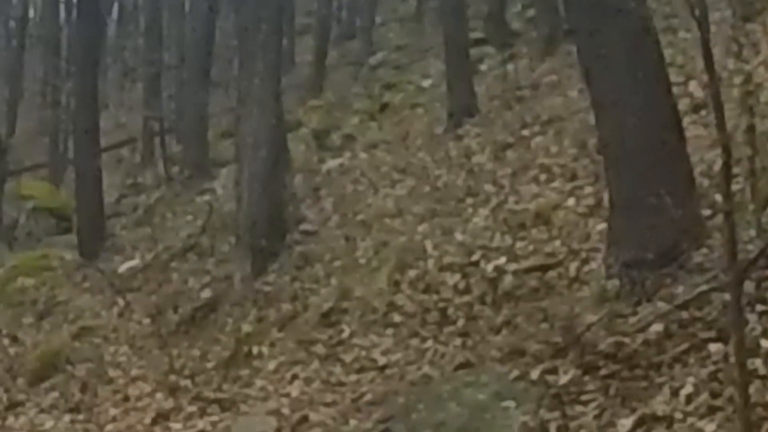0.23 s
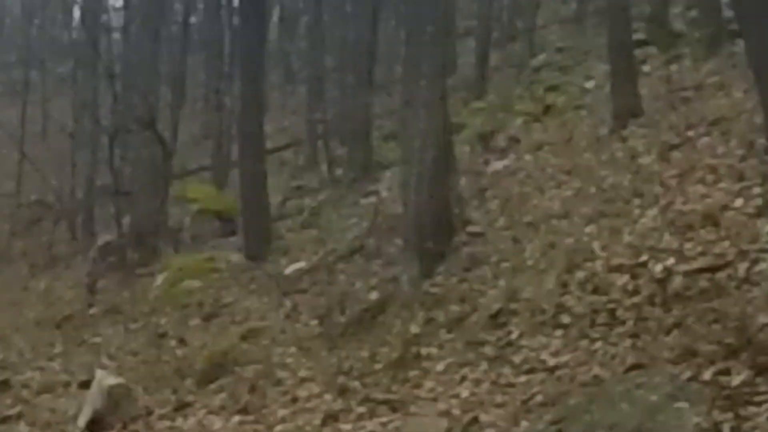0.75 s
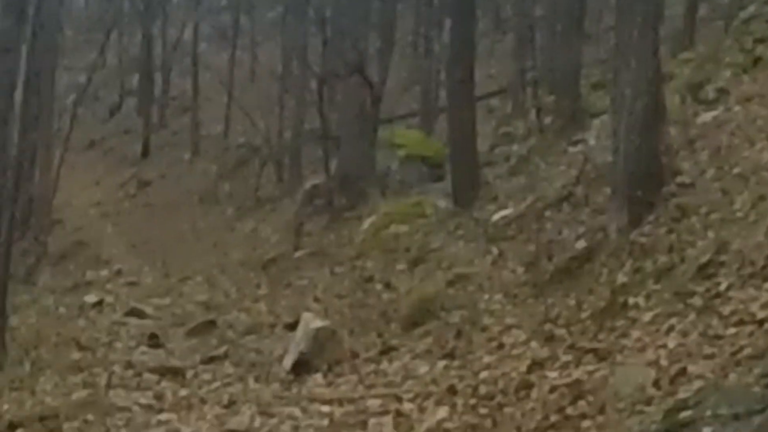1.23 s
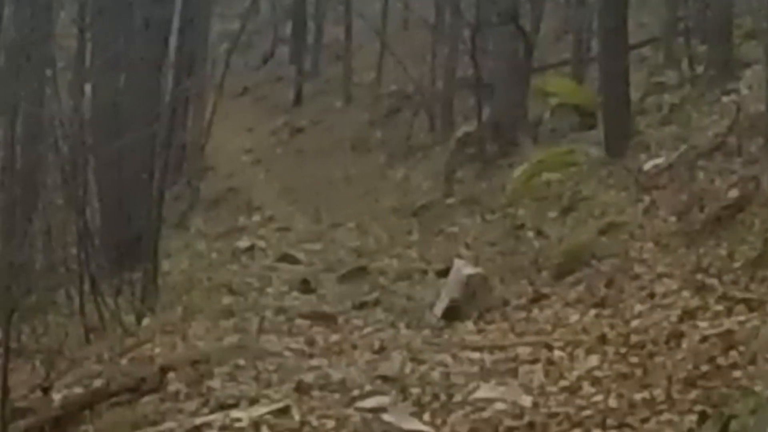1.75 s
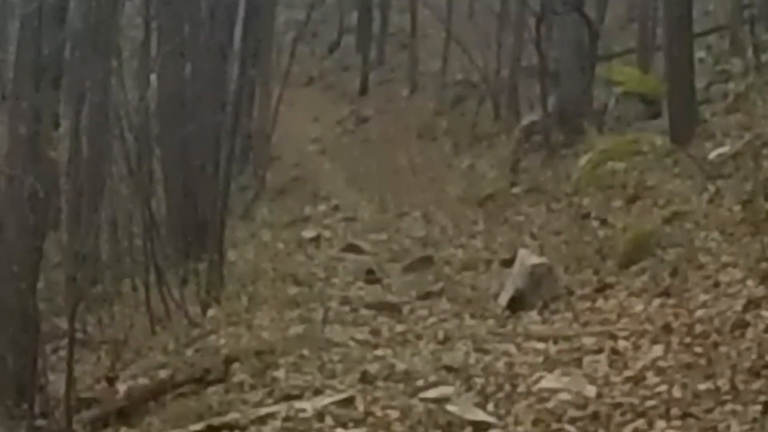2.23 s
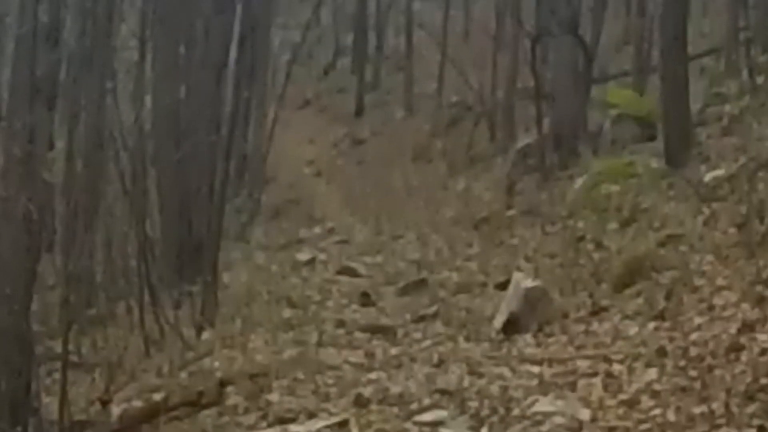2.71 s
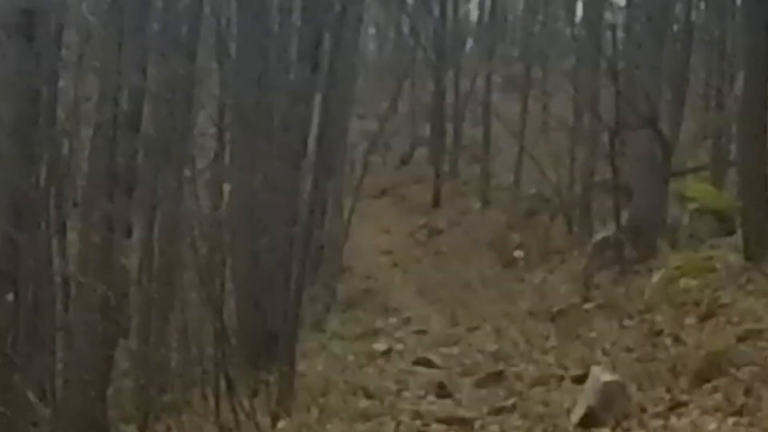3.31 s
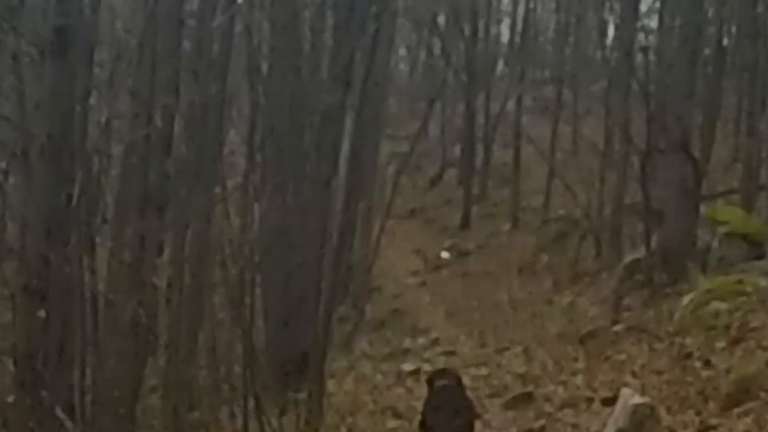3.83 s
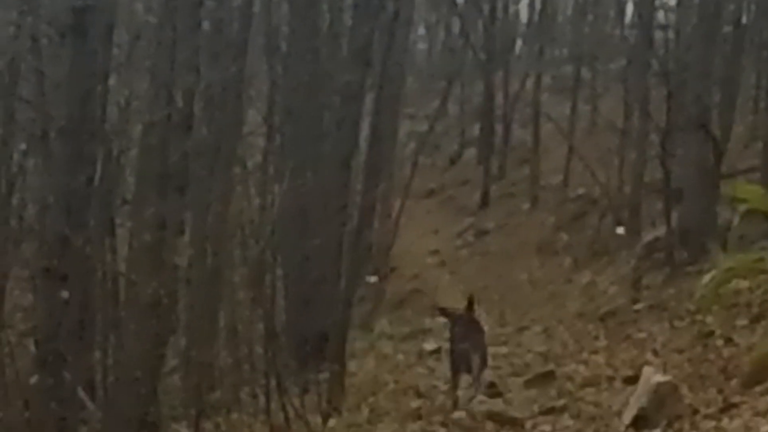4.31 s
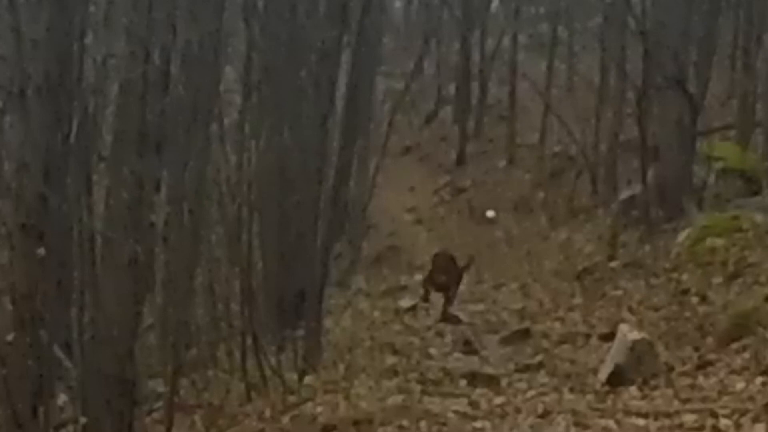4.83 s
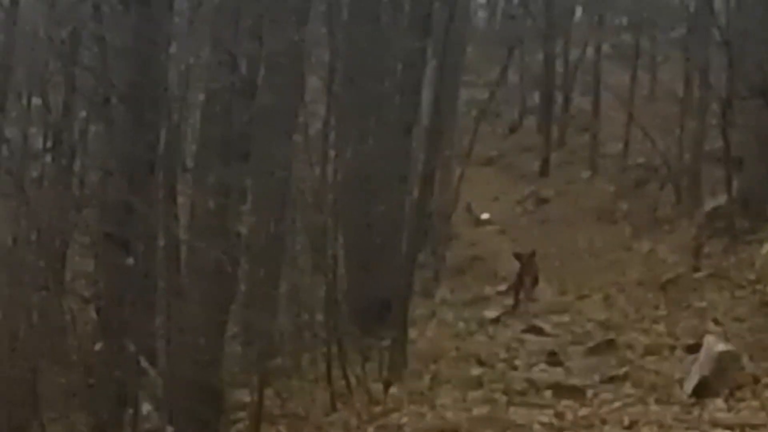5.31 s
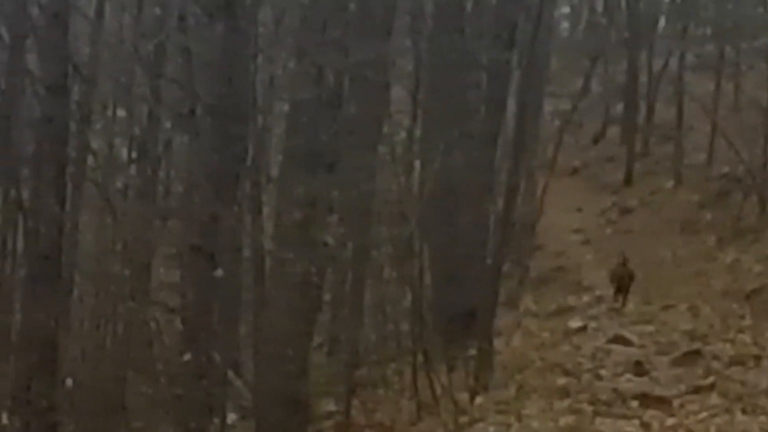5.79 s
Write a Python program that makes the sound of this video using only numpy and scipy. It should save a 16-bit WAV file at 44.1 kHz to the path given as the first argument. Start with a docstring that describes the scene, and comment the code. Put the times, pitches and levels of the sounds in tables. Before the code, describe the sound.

Close, light crunches of dry leaves and snapping twigs sound over the faint hush of woods, with slight air rumble on a handheld microphone. Its casing takes a small hollow knock and later a much louder, sharp one with a low thump. About eight hard, uneven clicks come next, close by. A couple of soft crunches follow, and a faint, short, rising animal whine sounds far off.

```python
"""Quiet forest: someone shifts about on dry leaves, holding the microphone.
Leaves crunch in bursts of tiny fractures and snapping twigs ring in damped modes. Hand swings push air
over the microphone; its plastic casing takes a hollow knock, later a loud, sharp one with a jolt.
A run of hard clicks follows close by. At the end a distant animal gives a short rising whine."""
import sys
import numpy as np
from scipy import signal
from scipy.fft import rfft, irfft, next_fast_len
from scipy.io import wavfile
from scipy.ndimage import uniform_filter1d

SR = 44100
rng = np.random.default_rng(int(sys.argv[2]) if len(sys.argv) > 2 else 0)


def dump(signal):
    """Clip the signal to [-1, 1] and save it as 16-bit WAV at the path in sys.argv[1]."""
    limited = np.clip(np.atleast_2d(signal).T, -1, 1)
    pcm = np.round(limited * 32767).astype(np.int16)
    wavfile.write(sys.argv[1], SR, pcm)


N = 267025
T = np.arange(N) / SR
BLOW_S = T[:SR // 5]  # time since a blow

# leaf fracture spectrum: f/Hz, level/dB
LEAF_SPECTRUM = [(200, -4), (600, -7.5), (950, 0), (1230, 4), (1550, -2.5), (2350, 2), (3000, -1),
                 (3700, -7), (4900, -3.5), (6000, -11), (6900, -7.5), (7700, -13.5), (8600, -12.5),
                 (10000, -18.5), (15000, -26.5)]


def undb(db):
    """Decibels to gain."""
    return 10 ** (np.asarray(db) / 20)


def unit(x):
    """Scale to unit rms."""
    return x / np.sqrt(np.mean(x ** 2))


def burst(x, db):
    """Scale the loudest 2 ms to an rms level."""
    return x * undb(db) / np.sqrt(uniform_filter1d(x ** 2, size=88).max())


def add(track, at_s, x):
    """Mix x into the track."""
    i = int(at_s * SR)
    track[i:i + len(x)] += x[:N - i]


def cut(x, hz, kind, order=2):
    """Butterworth low- or high-pass."""
    return signal.sosfilt(signal.butter(order, hz, kind, fs=SR, output="sos"), x)


def resonate(x, hz, width_hz):
    """Band-pass, unit gain at the centre."""
    return signal.lfilter(*signal.iirpeak(hz, hz / width_hz, fs=SR), x)


def colour(x, points):
    """Minimum-phase filter through points of f/Hz, level/dB."""
    size = 2 * next_fast_len(len(x))
    hz, db = np.transpose(points)
    bin_hz = np.arange(size // 2 + 1) * SR / size
    gain = undb(np.interp(np.log(bin_hz + 1), np.log(hz), db))
    cepstrum = irfft(np.log(gain))
    cepstrum[1:size // 2] *= 2
    cepstrum[size // 2 + 1:] = 0
    return irfft(rfft(x, size) * np.exp(rfft(cepstrum)))[:len(x)]


def hold(start_s, end_s, ramp_s):
    """Trapezoid envelope, 0 to 1."""
    return np.clip(np.minimum(T - start_s, end_s - T) / ramp_s, 0, 1)


def walk(rate_hz, count=N):
    """Smooth random drift, unit rms."""
    k = int(SR / rate_hz)
    steps = np.repeat(rng.standard_normal(count // k + 1), k)
    return unit(uniform_filter1d(uniform_filter1d(steps, k), k)[:count])


def fade(t60_s):
    """Exponential decay after a blow."""
    return np.exp(-np.log(1000) * BLOW_S / t60_s)


def dying_noise(t60_s):
    """White noise decaying after a blow."""
    return rng.standard_normal(len(BLOW_S)) * fade(t60_s)


def ring(modes, detune, tilt_db_oct=0):
    """Damped modes; pitch and strength vary from blow to blow."""
    out = 0
    for k, (hz, db, t60_s) in enumerate(modes):
        pitch_draw, jitter_db = rng.standard_normal(2)
        gain = undb(db + jitter_db + tilt_db_oct * np.log2(hz / modes[0][0]))
        tone = np.sin(2 * np.pi * hz * (1 + detune * pitch_draw) * BLOW_S)
        out = out + (-1) ** k * gain * fade(t60_s) * tone
    return out


def crackle(rate_hz, spread_db, count):
    """Leaf fractures: random impulses, mostly small, a few large."""
    hits = rng.random(count) < rate_hz / SR
    size = np.minimum(rng.exponential(size=count), 4)
    sign = rng.choice([-1, 1], count)
    return hits * sign * undb(spread_db * size)


def forest():
    """Even hush of the woods."""
    # hush spectrum: f/Hz, level/dB
    spectrum = [(15, -26), (25, -3), (86, -2), (128, -5.5), (213, -5.5), (264, -8), (427, -10), (558, -12),
                (655, -12.5), (1060, -15.5), (1460, -17), (5010, -25.5), (12100, -36.5), (13500, -37),
                (15000, -46)]
    level_db = -60.5 + .6 * walk(3)
    return unit(colour(rng.standard_normal(N), spectrum)) * undb(level_db)


def rumble():
    """Air buffets the microphone, swelling with each swing of the hand."""
    # hand swings: fastest at t/s, level/dB, half length/s
    swings = [(0.523, -57.5, 0.21), (1.24, -54, 0.225), (1.913, -48, .19)]
    # buffeting spectrum: f/Hz, level/dB
    spectrum = [(15, 0), (35, -3.5), (70, -6.5), (140, -17), (300, -27.5), (1000, -56.5)]
    still_db = -68
    power = undb(still_db) ** 2
    for at_s, db, half_s in swings:
        power = power + undb(db) ** 2 * np.exp(-((T - at_s) / half_s) ** 2)
    return unit(colour(rng.standard_normal(N), spectrum)) * np.sqrt(power)


def leaf_stir():
    """The litter crackles faintly throughout, more while the feet shuffle."""
    rest_db, shuffle_gain_db = -74.5, 5
    level_db = rest_db + shuffle_gain_db * hold(start_s=.1, end_s=4, ramp_s=.48)
    fractures = crackle(rate_hz=2200, spread_db=4.5, count=N)
    return unit(colour(fractures, LEAF_SPECTRUM)) * undb(level_db + 2 * walk(22))


def leaf_crunches():
    """Pressed leaves fracture in clumps as they fold; a firmer press rings the litter's hollows more."""
    # presses: peak t/s, level/dB, fall/s, tilt/(dB/oct)
    presses = [(.374, -47.5, 0.022, 0), (0.492, -53, 0.0029, 2), (0.638, -42.5, 0.0077, -1.7),
               (.652, -43, 0.0089, -1.5), (.89, -62.5, 0.074, 0), (1.95, -44, 0.016, -2.5),
               (2.356, -48, 0.009, -1), (2.371, -52, 0.019, 4), (2.523, -53.5, 0.016, 2),
               (2.65, -63.5, 0.045, 3.5), (2.718, -55, 0.0036, 0), (2.873, -53.5, 0.0086, 5),
               (2.905, -64, 0.01, 2.5), (3.108, -57.5, 0.024, 0.5), (3.21, -59.5, 0.02, 1.5),
               (3.3137, -53.5, 0.0067, 1.5), (3.324, -62, .007, 0), (3.341, -51, .003, -1),
               (3.428, -49.5, 0.0054, -0.5), (3.668, -61.5, 0.01, 3), (4.323, -60.5, 0.0096, 5),
               (4.356, -57.5, 0.016, 2), (4.864, -55.5, 0.012, -0.5)]
    # hollows in the litter: f/Hz, level/dB, t60/s
    hollow_modes = [(780, -16, 0.039), (1167, -8.5, 0.13), (2320, -7.5, 0.06), (5080, 9, 0.011)]
    out = np.zeros(N)
    lead_s = .25
    t = T[:SR // 2] - lead_s
    for at_s, db, fall_s, tilt_db_oct in presses:
        fractures = crackle(rate_hz=7000, spread_db=3.5, count=len(t))
        fractures *= undb(1.8 * walk(rate_hz=220, count=len(t)))  # clumps
        spectrum = [(hz, level + tilt_db_oct * np.log2(hz)) for hz, level in LEAF_SPECTRUM]
        response = ring(hollow_modes, detune=.0074, tilt_db_oct=tilt_db_oct)
        hollow = unit(signal.fftconvolve(fractures, response)[:len(t)])
        hollow_db = -6.5 + .65 * (db + 45)
        grains = unit(unit(colour(fractures, spectrum)) + undb(hollow_db) * hollow)
        rise_s = .012 * (fall_s / .02) ** 1.58  # short crunches start abruptly, long ones swell
        envelope = np.exp(np.minimum(t / rise_s, -t / fall_s))
        add(out, at_s - lead_s, grains * undb(db) * envelope)
    return out


def twig_snaps():
    """A twig gives way: two bending modes ring and fibres tear."""
    # twigs: t/s, level/dB, f/Hz
    twigs = [(0.3747, -37.5, 1240), (0.4918, -45.5, 1520), (0.51, -56, 1500), (0.5655, -56.5, 3000),
             (1.0522, -42, 820), (1.3948, -39, 2610), (1.692, -35, 2400), (1.8187, -36.5, 2200),
             (1.925, -44, 1880), (2.1574, -50, 1440), (2.2517, -53, 4520), (3.4003, -50, 1680),
             (3.4231, -47, 1280), (3.4678, -45.5, 1210), (4.3554, -48, 2850), (4.8602, -47.5, 770),
             (4.8615, -54, 2010)]
    out = np.zeros(N)
    for at_s, db, hz in twigs:
        decay_s = .019 * (hz / 1000) ** -.58  # thinner, higher twigs die sooner
        modes = [(hz, 0, .53 * decay_s), (1.82 * hz, -11, .3 * decay_s)]
        bending = burst(ring(modes, detune=.0065), 0)
        fibres = burst(cut(dying_noise(1.56 * decay_s), 1.22 * hz, "low", order=4), -2)
        tick = cut(cut(dying_noise(.0052), 3000, "high"), 9900, "low")
        snap = cut(bending + fibres, .6 * hz, "high", order=5)
        add(out, at_s, burst(snap, db) + burst(tick, db - 24))
    return out


def casing_knock():
    """One hard, hollow plastic knock on the microphone's casing, with short ringing modes."""
    # casing modes: f/Hz, level/dB, t60/s
    modes = [(751, 3, 0.055), (1204, -1, 0.05), (1340, -1, .02), (1610, -7, 0.034), (2190, 6, 0.013),
             (2460, 3, 0.018), (3890, -4, 0.022), (5300, -6, .008), (7600, -4, .007)]
    out = np.zeros(N)
    contact = burst(cut(dying_noise(.0098), 3100, "low"), -3.5)
    casing = burst(ring(modes, detune=.0035), 0)
    add(out, at_s=.3843, x=burst(casing + contact, db=-29))
    return out


def microphone_bumps():
    """Soft pressure pulses that swing back, each with a dull scuff that grows with contact speed."""
    # bumps: t/s, level/dB, contact time/s
    bumps = [(0.385, -30.5, 0.0018), (.494, -43.5, 0.0024), (0.579, -35, 0.0019), (0.597, -22.5, 0.00095),
             (0.6383, -26.5, 0.0024), (1.9423, -9, 0.0017), (3.47, -40, 0.00075), (4.863, -40.5, 0.00073),
             (5.483, -44.5, .0018)]
    push, scuffs = np.zeros((2, N))
    quick_contact_s = .0007
    for at_s, db, contact_s in bumps:
        push += undb(db) * np.exp(-.5 * ((T - at_s) / contact_s) ** 2)
        scuff = cut(cut(dying_noise(.049), 564, "low", order=3), 150, "high")
        add(scuffs, at_s - contact_s, burst(scuff, db - 24) * quick_contact_s / contact_s)
    return cut(push, 20.6, "high") + scuffs


def loud_housing_knock():
    """A loud, sharp knock against the microphone's housing: hard hit, brighter rattle, short tail."""
    # stages: t/s, level/dB, t60/s, low f/Hz, top f/Hz, rattle re impulse/dB
    stages = [(1.941, -13, 0.011, 200, 2380, -11), (1.9426, -19.5, 0.0095, 2500, 13500, -4),
              (1.947, -41, 0.045, 700, 4200, -6)]
    # housing response: f/Hz, level/dB
    spectrum = [(200, 1), (600, -4.5), (800, -9.5), (1000, -10), (1200, 4), (1450, -9), (2100, 3),
                (2800, -9), (3550, 1), (4100, -5), (4600, 0.5), (5500, -21), (6400, -5), (7500, -29),
                (8500, -10), (13000, -19), (16000, -24)]
    out = np.zeros(N)
    for at_s, db, t60_s, low_hz, top_hz, rattle_db in stages:
        rattle = dying_noise(t60_s)
        hit = signal.unit_impulse(len(rattle)) + undb(rattle_db) * rattle / np.linalg.norm(rattle)
        stage = cut(colour(hit, spectrum), low_hz, "high", order=1)
        add(out, at_s, burst(cut(stage, top_hz, "low", order=3), db))
    return out


def hard_clicks():
    """Each click rings the same short modes, plus one that depends on where the object gives way."""
    # clicks: t/s, level/dB
    clicks = [(3.0420, -29), (3.0852, -48), (3.1852, -30.5), (3.2540, -39.5), (3.3556, -30), (3.5147, -36),
              (3.6398, -30.5), (3.7059, -40)]
    # modes of the clicking object: f/Hz, level/dB, t60/s
    modes = [(1093, -14.5, 0.041), (1257, -17, 0.041), (1740, 1, 0.023), (2400, -4, 0.014),
             (2700, -5, 0.017), (3420, 1, .011), (3950, -5, 0.016), (4500, -5, 0.016), (5370, -7, 0.0083),
             (6700, -25, 0.037)]
    out = np.zeros(N)
    force_rise_s = .00043
    for at_s, db in clicks:
        local_hz = 2900 * 2 ** (.14 * rng.standard_normal())
        top_hz = 5440 + 77 * (db + 31.5)  # softer is duller
        body = burst(ring(modes, detune=.0035, tilt_db_oct=-.6), 0)
        grit = cut(dying_noise(.0078), 870, "high") * (1 - np.exp(-BLOW_S / force_rise_s))
        local_mode = burst(resonate(grit, local_hz, width_hz=400), -13.5)
        edge = burst(cut(cut(dying_noise(.014), 4000, "high"), 8800, "low"), -30.5)
        click = cut(body + local_mode + burst(grit, -8), 850, "high", order=4)
        add(out, at_s, burst(cut(click, top_hz, "low", order=6) + edge, db))
    return out


def animal_whine():
    """A thin rising call loses its overtone and beats against its echoes from the slope."""
    start_s, end_s, rise_s = 5.935, 6.043, .076
    start_hz, top_hz = 920, 1179
    age_s = np.clip(T - start_s, 0, end_s - start_s)
    arch_hz = top_hz - (top_hz - start_hz) * (1 - age_s / rise_s) ** 2  # stops just past its top
    phase = 2 * np.pi * np.cumsum(arch_hz * (1 + .0108 * walk(170))) / SR
    overtone_db, level_db = -5.5 - 230 * age_s, -51 + 40 * age_s
    tone = np.sin(phase) + undb(overtone_db) * np.sin(2 * phase)
    call = undb(level_db) * hold(start_s, end_s, ramp_s=.014) * tone
    echoes = sum(undb(db) * np.interp(T - lag_s, T, call) for lag_s, db in [(.021, -7.5), (.048, -5)])
    return call + echoes


def forest_echoes(x, ground_db, ground_t60_s, trunk_db, trunk_t60_s):
    """Weak scatter from the ground, a fainter return from the trunks."""
    t = T[:SR]
    envelope = undb(ground_db - 60 * t / ground_t60_s) + undb(trunk_db - 60 * t / trunk_t60_s)
    response = rng.standard_normal(SR) * envelope * (t > .004)
    response = cut(cut(response, 4940, "low"), 410, "high")
    return signal.fftconvolve(x, response)[:N]


def scene():
    """Close sounds with faint echoes, over the forest; mono."""
    close = leaf_stir() + leaf_crunches() + twig_snaps()
    close = close + casing_knock() + loud_housing_knock() + hard_clicks()
    echoes = forest_echoes(close, ground_db=-45, ground_t60_s=.063, trunk_db=-69, trunk_t60_s=1)
    return (forest() + rumble() + close + echoes + microphone_bumps() + animal_whine())[None]


def record(dry):
    """Steep low-pass at 15.3 kHz."""
    return signal.sosfilt(signal.ellip(8, .2, 70, 15300, fs=SR, output="sos"), dry)


dry = scene()
out = record(dry)
dump(out)
```